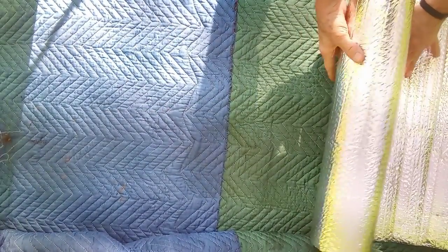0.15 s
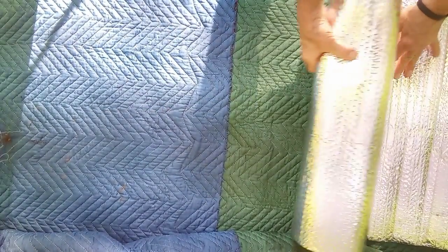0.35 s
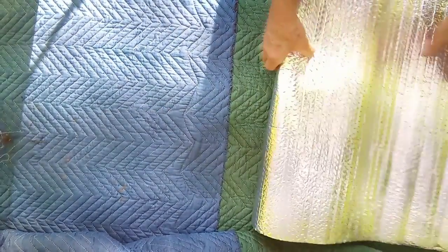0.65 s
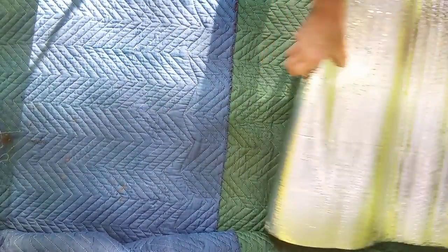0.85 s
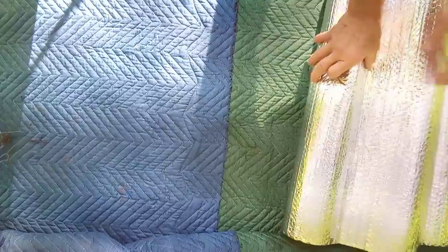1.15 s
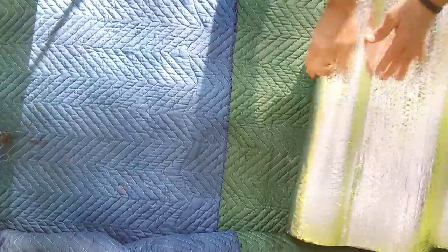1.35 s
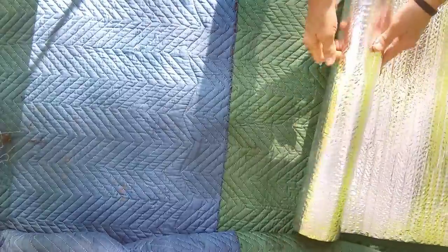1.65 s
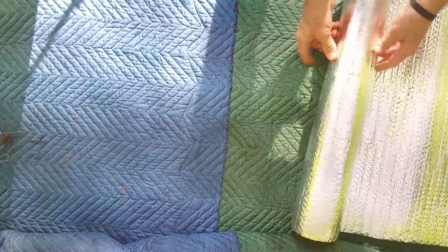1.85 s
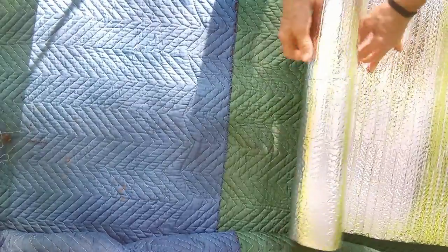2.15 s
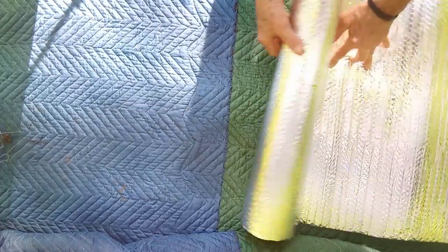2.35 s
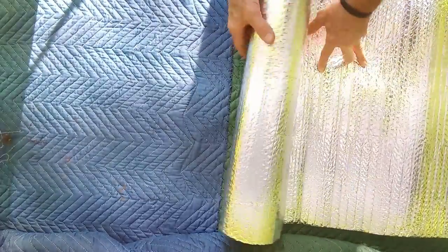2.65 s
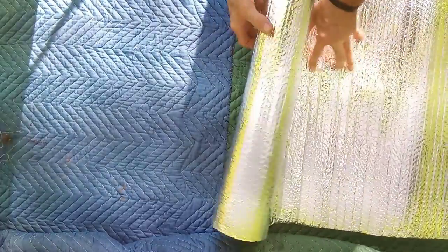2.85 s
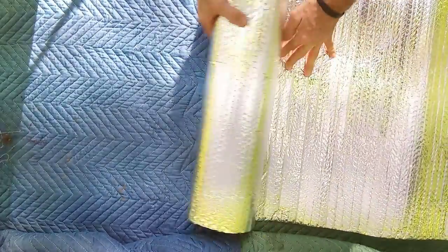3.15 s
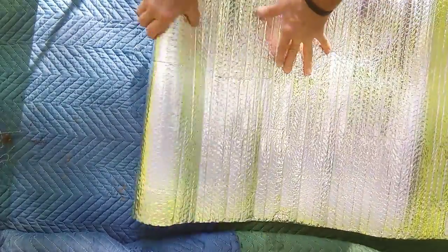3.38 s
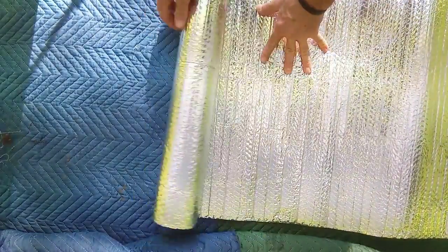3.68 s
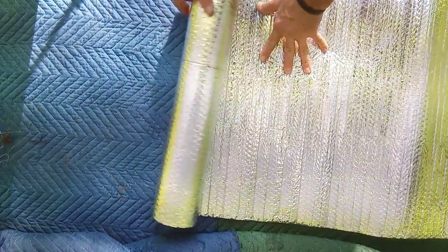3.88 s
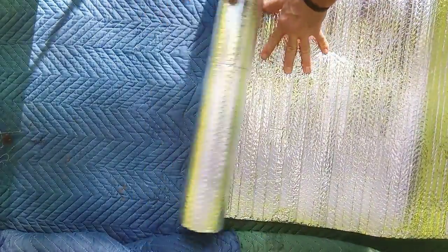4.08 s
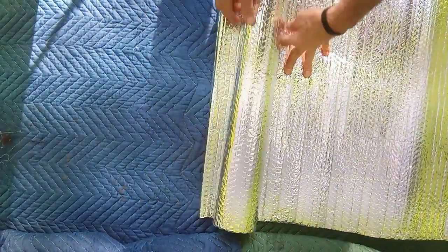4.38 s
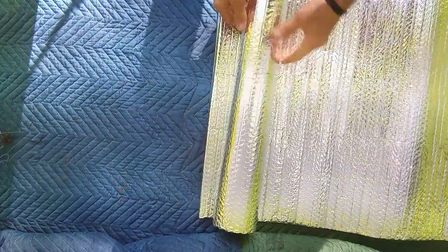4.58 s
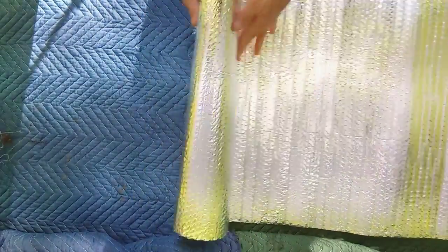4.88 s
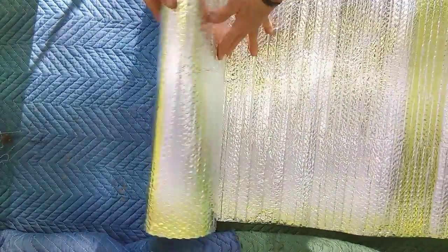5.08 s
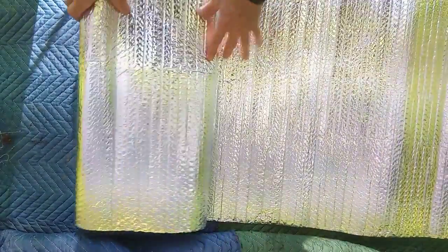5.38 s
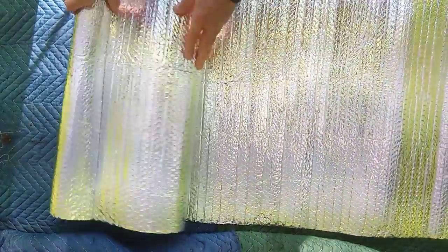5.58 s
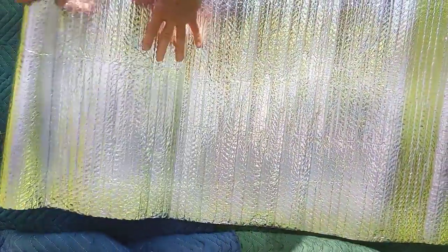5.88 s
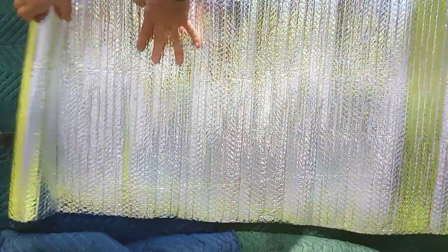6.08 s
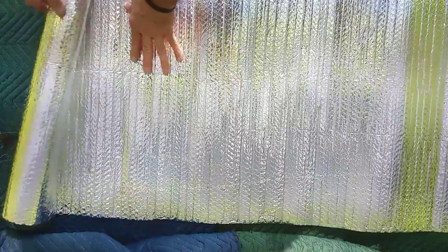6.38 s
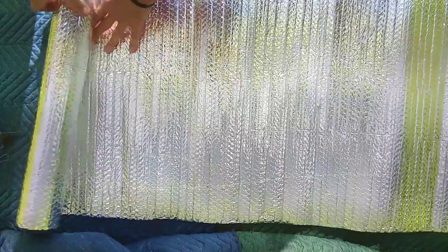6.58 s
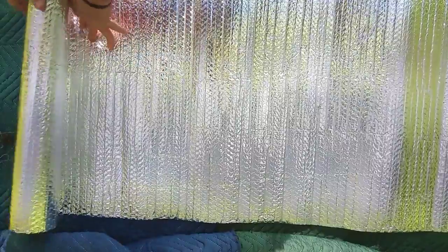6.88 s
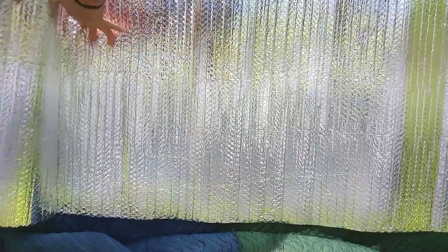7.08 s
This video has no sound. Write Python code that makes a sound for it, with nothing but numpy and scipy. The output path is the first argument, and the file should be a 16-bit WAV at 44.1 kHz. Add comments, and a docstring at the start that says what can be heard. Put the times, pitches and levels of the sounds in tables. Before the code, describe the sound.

Close, dry stereo outdoors with barely audible open air. From 0 s a foil-faced foam mat crackles brightly, countless tiny buckles over a papery rustle, mostly right of centre. Pulls surge at 0.2-1.1 s with sharp crease snaps near 0.4, 0.5 and 0.9, taut foil faintly singing, and hollow sliding on cloth. A crisp flare at 1.45 leads to uneven rustles, palm rubs and soft tube rumbles until 2.3. The strongest dull thump lands at 2.4-2.5, another near 3.0 and 3.3, amid continued crinkling to 3.7. From 3.8 to 4.8 it is sparser, stop-and-go, with clicks; at 4.37-4.5 fingers rasp and ribs pop in a rapid hollow rattle. Fuller crackle resumes at 4.85-5.85, with a double thud near 5.17. Shorter crinkly strokes, small snaps, light pats and a soft low air puff near 6.6 continue to a last flare at 7.2 s.

```python
"""A foil-faced foam mat is unrolled by hand over a quilted blanket, outdoors and heard from close by.
From the start, pulls and bends make the foil buckle in random avalanches of bright crackle, while
resonant noise slides with the foam on the cloth, the palm rubs and the turning tube rumbles.
Creases snap, fingers stick and slip, blows thud as dispersed pulses and taut foil sings in a narrow band.
Puffs of air follow, and midway ribs of the roll pop through in a quick run of decaying modes."""
import sys
import numpy as np
from scipy import signal
from scipy.fft import rfft, irfft, next_fast_len
from scipy.io import wavfile
from scipy.ndimage import uniform_filter1d, map_coordinates

SR = 44100
rng = np.random.default_rng(int(sys.argv[2]) if len(sys.argv) > 2 else 0)


def materialize(psi):
    """Save the field psi as 16-bit PCM at rate SR to the path in sys.argv[1].

    A 1-D psi becomes a single channel; in a 2-D psi each row is a channel.
    """
    bounded = np.clip(np.atleast_2d(psi).T, -1, 1)
    quanta = np.round(bounded * 32767).astype(np.int16)
    wavfile.write(sys.argv[1], SR, quanta)


N = 319276
TIME = np.arange(N) / SR
TOP_HZ = 15500  # upper limit of the sound

# Where the foil is worked. Each row: time in seconds, left minus right of the crinkle in dB,
# left minus right of the finest crackle in dB.
FOIL_PLACE = [(0.0, -8, -14), (0.9, -8, -10), (2.7, -8, -9), (3.2, -7, -9), (3.4, -6.5, -3),
              (4.45, -6, -3.5), (5.05, -7, -8), (5.26, -5, -1), (6.1, -7, 1), (6.6, -7, -2),
              (7.24, -4.5, 2.5)]
# The roll is patted or flops down. Each row: start in seconds, relative level in dB, pitch in Hz,
# ring time (60 dB decay) in seconds.
BLOWS = [(0.175, -34.5, 167, 0.3), (0.617, -34, 420, 0.12), (0.725, -37.5, 136, 0.036),
         (1.22, -41.5, 497, 0.17), (1.349, -32.5, 316, 0.02), (1.377, -30, 291, 0.013),
         (1.491, -35, 418, 0.2), (1.598, -33, 308.2, 0.023), (1.767, -37.5, 175, 0.095),
         (1.837, -31.5, 580, 0.024), (1.955, -35.5, 336, 0.038), (1.963, -38, 200.7, 0.12),
         (2.266, -35, 380, 0.053), (2.414, -21.5, 487, 0.038), (2.495, -25, 372, 0.045),
         (2.046, -43, 328, .04), (2.412, -41, 159, 0.055), (2.979, -40, 401, 0.021),
         (2.988, -29.5, 183, 0.084), (3.286, -37, 479.7, 0.027), (3.305, -36.5, 460, 0.027),
         (3.34, -26, 498, 0.016), (4.385, -37, 329, 0.023), (4.391, -50, 75, 0.078),
         (4.775, -38, 220.8, 0.25), (5.158, -31, 239.7, 0.024), (5.18, -25.5, 217, 0.1),
         (6.236, -37.5, 229, 0.051), (6.601, -45, 161.3, .05), (6.629, -42, 228, .08),
         (6.866, -34.5, 215.7, 0.079), (7.184, -35, 298.6, 0.011), (7.22, -42, 169.3, 0.039)]
# Colour of soft skin contact. Each row: frequency in Hz, relative level in dB.
TOUCH_COLOUR = [(200, -16), (700, -17), (1000, 3.5), (1250, 6.5), (1550, -9), (2200, 0), (5000, -51)]
# Colour of a snapping or clicking crease. Each row: frequency in Hz, relative level in dB.
TICK_COLOUR = [(1000, -29), (3000, -21), (6000, -1), (9000, 1), (12000, -5), (13800, -14), (15200, 3.5)]


def amp(db):
    """Decibels to gain."""
    return 10 ** (np.asarray(db) / 20)


def unit(x):
    """Scale to rms 1."""
    return x / np.sqrt(np.mean(x ** 2) + 1e-20)


def along(points, hz):
    """(Hz, value) points read on a log frequency axis."""
    f, v = np.transpose(points)
    return np.interp(np.log(hz + 1), np.log(f), v)


def curves(rows):
    """One value per sample for each column after the time."""
    s, *cols = np.transpose(rows)
    return [np.interp(TIME, s, c) for c in cols]


def wobble(rate):
    """A smooth random curve with rate knots a second."""
    knots = rng.standard_normal(8192)
    return map_coordinates(knots, [TIME * rate], mode="wrap")


def gesture(start, end, attack, release):
    """Gain that swells up to start, holds until end and dies away; attack and release are time constants."""
    rising = (start - TIME) / attack
    falling = (TIME - end) / release
    return np.exp(-np.clip(np.maximum(rising, falling), 0, 20))


def filtered(x, response):
    """x times a response of frequency."""
    m = next_fast_len(N + SR // 2)
    return irfft(rfft(x, m) * response(np.fft.rfftfreq(m, 1 / SR)), m)[..., :N]


def ring(x, spectrum, size=2048):
    """Causal (minimum-phase) colour: each click rings after it starts, never before."""
    cep = irfft(np.log(amp(along(spectrum, np.fft.rfftfreq(size, 1 / SR)))))
    cep[1:size // 2] *= 2
    cep[size // 2 + 1:] = 0
    answer = irfft(np.exp(rfft(cep)))
    return signal.fftconvolve(x, answer[None] / np.linalg.norm(answer), axes=1)[:, :N]


def pair(side_db):
    """Stereo white noise with a given share of difference between the ears."""
    mid, side = rng.standard_normal((2, N))
    return unit(np.array([mid + amp(side_db) * side, mid - amp(side_db) * side]))


def panned(db):
    """Left and right gains of constant power for a left minus right level in dB."""
    g = np.array([amp(db / 2), amp(-db / 2)])
    return g / np.sqrt(np.mean(g ** 2, axis=0))


def add(track, s, sound):
    """Lay a sound into a track at s seconds."""
    start = max(round(s * SR), 0)
    track[:, start:start + sound.shape[-1]] += sound[..., :N - start]


def bursts(rate, spread_db, life):
    """Power of random bursts of uneven size that start at once and die away; mean 1."""
    size = amp(spread_db * np.minimum(rng.standard_normal(N), 2))
    starts = rng.random(N) < rate / SR
    power = signal.lfilter([1], [1, -np.exp(-1 / (life * SR))], starts * size ** 2)
    return power / power.mean()


def patchy(x, depth_db, size=1024):
    """Every spot of the sheet has its own colour, so the colour shifts as the contact moves."""
    z = signal.stft(x, nperseg=size, noverlap=size * 3 // 4)[2]
    field = uniform_filter1d(rng.standard_normal(z.shape[1:]), size=5, axis=0)
    field = uniform_filter1d(field, size=7, axis=1)
    coloured = z * amp(depth_db * unit(field))
    return unit(signal.istft(coloured, nperseg=size, noverlap=size * 3 // 4)[1][:, :N])


def singing(centre_hz, width_hz, side_db):
    """A narrow band of noise that follows a moving pitch: slow noise shifted up in frequency."""
    slow = filtered(pair(side_db), lambda hz: 1 / (1 + (hz / width_hz) ** 2))
    analytic = signal.hilbert(slow, next_fast_len(N))[:, :N]
    carrier = np.exp(2j * np.pi * np.cumsum(centre_hz - width_hz / 2) / SR)
    return unit(np.real(analytic * carrier))


def hollow(x):
    """The air inside the roll rings along with the direct sound."""
    # Resonances of the rolled tube. Each row: frequency in Hz, width in Hz, relative level in dB.
    tube_modes = [(153, 33, -2), (212, 32, -4), (590, 65, -2.5), (1290, 97, -18), (1650, 63, -1.5)]

    def modes(f):
        return sum(amp(db) * 1j * f * width / (hz * hz - f * f + 1j * f * width)
                   for hz, width, db in tube_modes)

    return filtered(x, lambda f: 0.62 + 0.51 * modes(f))


def travelling(x):
    """The nearer microphone hears the roll first."""
    # The roll's path past the microphones. Each row: time in seconds, lead of the left ear in ms.
    lead_rows = [(0, 0.2), (.9, 0.27), (1.7, 0.28), (3.2, -0.0095), (4.7, -0.25), (5.4, -0.26),
                 (7.2, -0.28)]
    lead_ms, = curves(lead_rows)
    shift = lead_ms / 1000 / 2  # seconds, half to each ear
    return np.array([np.interp(TIME + shift, TIME, x[0]), np.interp(TIME - shift, TIME, x[1])])


def open_air():
    """Faint open air: steady coloured noise."""
    # Each row: frequency in Hz, relative level in dB.
    air_colour = [(20, -40), (80, -15), (200, -1.5), (700, -11.5), (1300, -7.5), (4000, -5.5), (15000, -15)]
    return amp(-65.0) * unit(ring(pair(-11.0), air_colour))


def snagging():
    """Drop in dB while the sheet is caught and stops bending."""
    # The crackle stalls. Each row: time it comes free in seconds, length in seconds, level change in dB.
    snag_rows = [(.396, .012, -5), (.471, .012, -6), (1.392, .02, -5), (1.64, .02, -3), (2.674, .015, -3),
                 (3.125, .02, -4), (3.77, .018, -4), (4.113, .02, -4), (4.36, .015, -3), (4.439, .016, -6),
                 (4.629, .01, -4), (4.722, .02, -7), (5.005, .025, -5), (5.563, .005, -2),
                 (6.52, .02, -1.5), (6.719, .012, -2)]
    return sum(db * gesture(s - length, s, attack=.008, release=.002) for s, length, db in snag_rows)


def flexing():
    """Pulls and bends add their power: relative dB of the crinkle, the rustle and the finest crackle."""
    # The hand pulls a length off the roll. Each row: start and end in seconds, then relative levels
    # in dB of the crinkle, the papery rustle and the finest crackle.
    pull_rows = [(0.0, 0.142, -49.5, -58.5, -56.5), (0.21, 0.272, -46, -53.5, -59),
                 (0.376, 0.473, -48.5, -53.5, -59), (0.533, 0.6, -45, -55, -54),
                 (0.634, 1.037, -45.5, -53.5, -51), (1.007, 1.145, -47.5, -54.5, -68),
                 (1.404, 1.46, -40, -61, -52), (1.483, 1.566, -46.5, -53, -62),
                 (1.634, 1.883, -51, -51, -58), (1.953, 2.14, -49.5, -55.5, -58),
                 (2.151, 2.618, -47.5, -54.5, -52.5), (2.675, 2.828, -51.5, -57.5, -53.5),
                 (2.85, 2.897, -59, -63, -61.5), (2.934, 3.093, -48.5, -54, -50),
                 (3.149, 3.698, -50, -57, -53.5), (3.787, 3.838, -58, -59.5, -58.5),
                 (3.946, 4.036, -54.5, -61, -60), (4.122, 4.183, -60, -61, -59.5),
                 (4.242, 4.266, -52, -59, -57), (4.361, 4.414, -56, -52, -53),
                 (4.512, 4.613, -59.5, -57.5, -55.5), (4.806, 4.848, -52, -50, -56),
                 (4.885, 5.312, -47, -53.5, -56), (5.357, 5.849, -48, -58, -54.5),
                 (5.924, 6.08, -48, -62, -53.5), (6.16, 6.243, -48.5, -64, -53.5),
                 (6.34, 6.377, -48.5, -56, -53), (6.418, 6.496, -55.5, -73, -56.5),
                 (6.517, 6.62, -50.5, -69, -48.5), (6.651, 6.824, -52, -58, -52.5),
                 (6.947, 6.995, -50.5, -62, -53.5), (7.111, 7.235, -49, -58.5, -55.5)]
    # The sheet bends sharply and the crinkle flares. Each row: peak time in seconds, relative levels
    # in dB of the crinkle and the papery rustle.
    bend_rows = [(0.26, -41.5, -59), (0.701, -42.5, -45.5), (0.98, -43, -55), (1.46, -46, -45.5),
                 (1.765, -48, -46.5), (1.85, -64.5, -50), (2.18, -54, -51), (2.439, -43, -52.5),
                 (2.799, -49, -67), (3.068, -48.5, -50.5), (3.37, -44, -70), (3.469, -44.5, -64),
                 (3.67, -62, -53), (4.27, -64.5, -51), (4.899, -58, -58.5), (5.06, -45.5, -47.5),
                 (5.24, -45.5, -55.5), (5.41, -46.5, -62), (6.227, -48.5, -48.5), (6.98, -53.5, -50.5),
                 (7.23, -42.5, -54)]
    # The mat is only held: relative levels in dB of the crinkle, the rustle and the finest crackle.
    resting_db = [-58, -70, -63.5]
    bend_fine_db = -18  # finest crackle of a bend, relative to its crinkle
    power = amp(resting_db)[:, None] ** 2 * np.ones(N)
    for start, end, crinkle_db, rustle_db, fine_db in pull_rows:
        pull = gesture(start, end, attack=0.0288, release=0.0537)
        power += np.outer(amp([crinkle_db, rustle_db, fine_db]), pull) ** 2
    for s, crinkle_db, rustle_db in bend_rows:
        bend = gesture(s, s, attack=0.041, release=0.029)
        power += np.outer(amp([crinkle_db, rustle_db, crinkle_db + bend_fine_db]), bend) ** 2
    unevenness_db = 0.61 * wobble(45)  # no pull is quite steady
    return 10 * np.log10(power) + snagging() + unevenness_db


def buckles(pops, avalanches, bed, patchy_db):
    """Tiny buckles come thickly and in avalanches; each scatters through the sheet for an instant."""
    grains = (pops + abs(bed)) / (1 + abs(bed))
    envelope = np.sqrt(grains * (avalanches + 2))
    return unit(envelope * patchy(pair(0), patchy_db))


def dimples(count=2400):
    """Embossed dimples flip one by one, each a decaying sine with its own pitch and size."""
    centre_hz, pitch_spread = 4900, .27  # spread as a log ratio
    decay_cycles, size_spread_db = 3.5, 4.5
    track, t = np.zeros((2, N)), np.arange(SR // 80) / SR
    for s, (pitch, size, side) in zip(rng.random(count) * N / SR, rng.standard_normal((count, 3))):
        hz = min(centre_hz * np.exp(pitch_spread * pitch), TOP_HZ)
        phase = rng.uniform(0, 2 * np.pi, (2, 1))
        pop = np.sin(2 * np.pi * hz * t + phase) * np.exp(-t * hz / decay_cycles)
        add(track, s, amp(size_spread_db * min(size, 2)) * panned(2 * side)[:, None] * pop)
    return unit(track)


def ticks(crinkle_db):
    """Tiny creases click; their size hardly follows the effort, so they stand out when the mat slows."""
    clicks = np.sqrt(bursts(rate=45, spread_db=3, life=.0007)) * pair(0)
    return amp(.5 * crinkle_db - 37) * unit(ring(clicks, TICK_COLOUR))


def foil(crinkle_db, rustle_db, fine_db):
    """Bending makes the foil skin crinkle and the sheet beneath it rustle."""
    # Colours of the foil skin, the finest crackle and the sheet beneath.
    # Each row: frequency in Hz, relative level in dB.
    skin_colour, fine_colour, sheet_colour = [(1500, -40), (2800, -14), (3700, -9), (5100, -4), (5950, 1),
                                              (6500, -2.5), (7200, -3.5), (7900, -10.5), (10000, -12.5),
                                              (12000, -19), (14000, -29), (16000, -34)], [(6500, -32), (9000, -14), (11000, -11),
                                                            (12500, -11.5), (13900, -12), (14500, -3),
                                                            (15100, 2), (15500, 1.5), (16000, -12)], [(400, -32.5), (800, -22),
                                                                             (1050, -12), (1270, -18),
                                                                             (1550, -10.5), (1850, -8),
                                                                             (2200, -1.5), (2700, -1.5),
                                                                             (3200, 2), (3900, -9.5),
                                                                             (5500, -14.5)]
    # The treble reaches the two microphones differently. Each row: frequency in Hz, left minus right in dB.
    ear_shade = [(1000, 5), (1280, 5), (1600, 14), (2200, 5.5), (2700, 9), (4000, 3), (5500, 3),
                 (7000, -3.5), (8800, -8.5), (11000, -3), (13500, 1), (15300, 3)]
    crowd_db = -50  # crinkle level at which the buckles merge into hiss
    dimple_db = -9  # relative to the foil skin
    place_db, fine_place_db = curves(FOIL_PLACE)
    pops = bursts(rate=1200, spread_db=4.5, life=.0003)
    avalanches = bursts(rate=240, spread_db=3.5, life=.005)
    creases = bursts(rate=750, spread_db=4, life=.0009)
    pinpricks = bursts(rate=1200, spread_db=4, life=.0006)
    crowd = amp(crinkle_db - crowd_db)  # slow bending leaves gaps between the buckles
    skin = unit(ring(buckles(pops, avalanches, bed=crowd, patchy_db=2.2), skin_colour))
    fine = unit(ring(buckles(pinpricks, avalanches, bed=0.46 * crowd, patchy_db=2.0), fine_colour))
    folds = buckles(creases, avalanches, bed=.7, patchy_db=2.4)
    folds = folds + 0.055 * folds[::-1]  # a little of each ear reaches the other
    rustle = amp(rustle_db + 3.5) * unit(hollow(ring(folds, sheet_colour)))
    crinkle = amp(crinkle_db + 1.5) * (skin + amp(dimple_db) * dimples()) + ticks(crinkle_db)
    placed = (crinkle + rustle) * panned(place_db)
    shaded = filtered(placed, lambda hz: panned(along(ear_shade, hz)))
    return shaded + amp(fine_db + 3.5) * fine * panned(fine_place_db)


def dragging(crinkle_db):
    """Relative dB and pitch in Hz of the sliding; each drag glides from its first pitch to its last."""
    # The mat drags over the blanket. Each row: start and end in seconds, relative level in dB,
    # pitch at the start in Hz, pitch at the end in Hz.
    drag_rows = [(0.0, 0.042, -55, 674, 526), (0.176, 0.215, -47.5, 364.3, 398.4),
                 (0.288, 0.562, -61, 416.3, 480), (0.598, 0.831, -49, 438, 582),
                 (0.912, 0.945, -47.5, 738, 725), (0.954, 1.04, -49, 623, 667.4),
                 (1.391, 1.51, -48, 381.3, 494), (1.563, 1.679, -54.5, 461, 509),
                 (1.738, 1.863, -52.5, 418.7, 627), (1.962, 2.047, -63.5, 334, 393),
                 (2.196, 2.331, -65.5, 428, 360), (2.395, 2.505, -55.5, 527, 340),
                 (2.595, 2.705, -57, 340.3, 342), (2.99, 3.003, -48.5, 478, 453),
                 (3.258, 3.348, -51.5, 437, 513), (3.574, 3.686, -64.5, 446, 433),
                 (4.08, 4.163, -57.5, 369.6, 397.6), (4.175, 4.201, -52.5, 553, 571),
                 (4.24, 4.278, -48.5, 640, 648), (4.38, 4.404, -45.5, 659, 648),
                 (4.435, 4.468, -54.5, 782, 780), (4.5, 4.678, -68, 647, 580),
                 (4.986, 5.056, -60, 610, 544), (5.185, 5.568, -64.5, 324, 392.5),
                 (5.794, 5.855, -62, 410.7, 432), (6.173, 6.252, -58.5, 500, 500),
                 (6.365, 6.388, -61.5, 541, 520), (6.885, 7.0, -63, 310, 277.6),
                 (7.182, 7.244, -56.5, 512, 487)]
    creep_db, creep_hz = -21.5, 486  # between drags the foam creeps: relative to the crinkle, pitch
    power = amp(crinkle_db + creep_db) ** 2
    pitch = power * creep_hz
    for start, end, db, from_hz, to_hz in drag_rows:
        drag = (amp(db) * gesture(start, end, attack=0.016, release=0.022)) ** 2
        power = power + drag
        pitch = pitch + drag * np.interp(TIME, [start, end], [from_hz, to_hz])
    return 10 * np.log10(power), pitch / power


def sliding(crinkle_db):
    """Foam drags over quilting in uneven catches: a hollow hush with a faint note gliding with the stroke."""
    sharpness, spread = 1.81, 0.32  # of each resonance; log ratio around the pitch
    slide_db, centre_hz = dragging(crinkle_db)
    sound, weights = np.zeros((2, N)), np.zeros(N)
    for band_hz in np.geomspace(280, 900, num=8):
        def resonance(hz):
            return 1 / (1 + (sharpness * (hz / band_hz - band_hz / (hz + 1))) ** 2)

        band = unit(filtered(pair(-14), resonance))
        weight = np.exp(-(np.log(centre_hz / band_hz) / spread) ** 2)
        sound += weight * band
        weights += weight ** 2
    note = singing(centre_hz, width_hz=70, side_db=-14)
    hush = patchy(sound / np.sqrt(weights + 1e-9), depth_db=3.0)
    mix = unit(hush + .55 * note)
    catches = unit(np.sqrt(bursts(rate=190, spread_db=3, life=.004) + 1.6))
    return amp(slide_db - 0.7) * catches * mix


def rolling(crinkle_db):
    """The soft tube rumbles as it turns over, after each bump, and faintly whenever the mat is worked."""
    # The tube turns over on the blanket. Each row: peak time in seconds, relative rumble level in dB,
    # time constant of the swell and fade in seconds.
    turn_rows = [(0.045, -49, 0.017), (0.21, -51, 0.045), (0.74, -55.5, 0.051), (1.43, -71, 0.037),
                 (1.6, -52, 0.02), (1.79, -46.5, 0.047), (1.985, -64, 0.028), (2.04, -51, 0.017),
                 (2.299, -54, 0.092), (2.509, -40, 0.012), (2.65, -59, 0.034), (3.31, -57, 0.03),
                 (3.61, -59, 0.029), (3.71, -58, 0.02), (3.95, -64, 0.029), (4.14, -70, .05),
                 (4.269, -52.5, 0.022), (4.39, -54, 0.018), (4.52, -61, 0.029), (5.003, -57, 0.011),
                 (5.06, -58, 0.024), (5.23, -52.5, 0.043), (5.82, -65.5, 0.015), (6.26, -51.5, 0.018),
                 (6.39, -52, 0.027), (6.65, -62.5, 0.015), (6.94, -65, 0.05), (6.999, -51, 0.013),
                 (7.24, -59, 0.014)]
    # Each row: frequency in Hz, relative level in dB.
    tube_colour = [(30, -27), (80, -13), (120, -4), (160, 2.5), (225, 2), (290, 0), (380, -4), (500, -42),
                   (1000, -35)]
    shake_db = -22.5  # rumble after a bump, relative to the bump's level in the table
    turns = sum((amp(db) * gesture(s, s, swell, swell)) ** 2 for s, db, swell in turn_rows)
    shakes = sum((amp(db + shake_db) * gesture(s, s, attack=0.013, release=0.011)) ** 2
                 for s, db, _, _ in BLOWS)
    level = np.sqrt(turns + shakes + amp(crinkle_db - 45.0) ** 2)
    unevenness = amp(-1.5 + 5.8 * wobble(37))
    return level * unevenness * unit(ring(pair(-15.5), tube_colour))


def palm(rustle_db):
    """The hand rubs on the roll as it works the sheet: a soft, narrow resonance that drifts with the grip."""
    # The palm rubs along the roll. Each row: start in seconds, end in seconds, relative level in dB.
    rub_rows = [(0.01, 0.065, -54), (0.645, 0.79, -56), (0.951, 1.034, -53), (1.686, 1.734, -57.5),
                (1.957, 2.071, -53), (2.129, 2.336, -57), (2.376, 2.429, -53), (2.69, 2.721, -54),
                (2.985, 3.009, -49.5), (3.584, 3.68, -60.5), (3.916, 3.985, -63), (4.08, 4.198, -63),
                (4.805, 5.082, -58.5), (5.13, 5.273, -53), (5.787, 5.923, -60.5), (6.337, 6.466, -61),
                (6.529, 6.665, -58), (6.767, 6.913, -61), (6.973, 6.986, -55), (7.12, 7.24, -81)]
    palm_db = -8  # steady share of the rub, relative to the rustle
    grip_hz, grip_drift_db = 1259, 1.13  # resonance under the hand; drift of its pitch as 20 log10 of the ratio
    grip_db = 3  # resonance over the broad rub
    rubs = sum((amp(db) * gesture(start, end, attack=0.012, release=0.0062)) ** 2
               for start, end, db in rub_rows)
    catches = np.sqrt(bursts(rate=180, spread_db=2.5, life=0.017) + 0.1)
    breadth = unit(ring(pair(-2.3), TOUCH_COLOUR))
    resonance = singing(grip_hz * amp(grip_drift_db * wobble(7)), width_hz=130, side_db=0.5)
    level = np.sqrt(rubs + amp(rustle_db + palm_db) ** 2)
    return level * unit(catches * (breadth + amp(grip_db) * resonance))


def snaps():
    """A larger crease pops through with a bright tick of fast-dying noise."""
    # Single creases snap. Each row: start in seconds, relative level in dB, left minus right in dB.
    snap_rows = [(0.0615, -34, -9), (0.0977, -32, -14), (0.176, -33, -13), (0.3245, -36, -10),
                 (0.377, -33, -11), (0.398, -23.5, -12), (0.4155, -30, -11), (0.4727, -22.5, -7),
                 (0.5038, -32, -11), (0.5926, -30, -10), (0.7805, -29, -14), (0.9212, -24, -7),
                 (1.1225, -32, -9), (1.166, -34, -9), (1.229, -39, -9), (1.273, -38, -9), (1.299, -41, -9),
                 (1.3843, -33, -11), (1.3978, -29, -11), (1.7594, -27, -7), (2.387, -31, -11),
                 (2.6779, -28, -11), (2.729, -31, -8), (2.7939, -31, -5), (2.9275, -31, -8),
                 (3.0185, -31, -7), (3.531, -31, -5), (3.746, -29, -4), (3.946, -37, -2), (4.0153, -34, -6),
                 (4.022, -33, -3), (4.117, -33, -5), (4.2028, -37, -6), (4.3665, -34, -2), (4.443, -32, -8),
                 (4.587, -35, -7), (4.596, -37, -7), (4.633, -30, -9), (4.7263, -35, -9), (5.1587, -29, -5),
                 (5.2036, -31, -8), (5.225, -31, -7), (5.5663, -29, -3), (5.6057, -30, -4),
                 (5.6925, -33, -3.5), (6.0806, -28, -2), (6.106, -32, -6), (6.5241, -32, -6),
                 (6.7231, -35, -3.5)]
    track, t = np.zeros((2, N)), np.arange(SR // 40) / SR
    decay = np.exp(-t / .0013) + .08 * np.exp(-t / .005)
    for s, db, pan_db in snap_rows:
        tick = np.tanh(rng.standard_normal((2, len(t)))) * decay
        tick = ring(tick, TICK_COLOUR)
        tick = tick / np.abs(tick).max(axis=1, keepdims=True)
        add(track, s, amp(db) * panned(pan_db)[:, None] * tick)
    return track


def scrubs():
    """Skin catches and slips in a quick uneven train; a light push sounds softly, a hard one rasps."""
    # Fingers stick and slip on the foil. Each row: time of the strongest slip in seconds,
    # relative level in dB, time constants of the build-up and the fade in seconds.
    scrub_rows = [(0.173, -47.5, 0.0077, 0.007), (.22, -46.5, 0.021, 0.019), (1.759, -42, 0.0088, 0.024),
                  (1.845, -53, 0.0064, 0.016), (2.259, -42, 0.0039, 0.022), (2.377, -44.5, 0.0032, 0.021),
                  (2.49, -44.5, 0.0056, 0.0096), (3.531, -44, 0.0008, 0.0053), (4.255, -43, 0.022, 0.025),
                  (4.386, -38.5, 0.009, 0.013), (4.402, -28.5, 0.0073, 0.007), (4.437, -47, 0.0097, 0.0037),
                  (4.454, -42, 0.0056, 0.013), (4.5, -52.5, 0.012, 0.04), (4.693, -51, 0.0028, 0.0038),
                  (4.77, -43, 0.0038, 0.0038), (6.179, -48, 0.0023, .005), (6.227, -48, 0.0067, 0.0082),
                  (6.575, -55, .02, .02)]
    # Rasp of a hard push. Each row: frequency in Hz, relative level in dB.
    finger_colour = [(100, -20), (300, 0), (650, -14), (900, -1), (1100, -1), (1300, 9), (1700, -13),
                     (2200, -8), (3200, -6), (4200, -23), (6000, -20), (12000, -48)]
    hard_push_db = -37  # push at which soft touch and rasp get equal weight
    push = np.zeros(N)
    for s, db, rise, fade in scrub_rows:
        push += amp(db) * np.exp(-np.maximum((s - TIME) / rise, (TIME - s) / fade))
    slip_hz = 420 * amp(3 * wobble(300))
    slips = np.diff(np.floor(np.cumsum(slip_hz) / SR), prepend=0)  # a click at each whole cycle
    scatter = signal.lfilter([1], [1, -np.exp(-1 / (0.00042 * SR))], slips) * pair(-3.5)
    judder = .5 * unit(slips) + unit(scatter)
    hard = push / (push + amp(hard_push_db))
    rasp = hard * unit(ring(judder, finger_colour))
    soft = (1 - hard) * unit(ring(judder, TOUCH_COLOUR))
    return push * (rasp + soft)


def bumps():
    """A blow travels as a bending wave, so the highs arrive first; then the tube rings briefly."""
    ring_db = -12  # the tube's own note, relative to the thud
    track, t = np.zeros((2, N)), np.arange(SR // 4) / SR
    hz = np.fft.rfftfreq(len(t), 1 / SR) + 1
    bending = np.exp(-1j * 1.024 * np.sqrt(hz))  # delay falls with frequency
    for s, db, pitch_hz, t60 in BLOWS:
        shape = np.exp(-(np.log(hz / pitch_hz) / 0.53) ** 2) / (1 + (hz / 670) ** 10)
        decay = amp(-60 * t / t60)
        flutter = 0.062 * rng.standard_normal(len(t)) * decay
        thud = irfft((1 + rfft(flutter)) * shape * bending, len(t))
        thud = thud / np.abs(thud).max()
        note = np.sin(2 * np.pi * pitch_hz * t) * decay * (1 - np.exp(-t * pitch_hz / 2))
        add(track, s, amp(db - 5.5) * (thud + amp(ring_db) * note) * (t < t[-1] / 2))
    return track


def sheen():
    """Where the sheet is pulled taut, its crackle gathers into a narrow, grainy band."""
    # A taut stretch sings at one resonance. Each row: start and end in seconds, relative level in dB,
    # pitch in Hz, width of each of two equal poles in Hz.
    sheen_rows = [(0.403, .58, -47.5, 5900, 200), (.66, 0.895, -47, 5850, 230),
                  (0.948, 1.15, -46, 6000, 260), (0.953, 1.053, -51.5, 1940, 260),
                  (1.765, 1.798, -53.5, 1790, 198), (2.93, 3.085, -52, 6020, 220),
                  (4.24, 4.305, -56, 3250, 150), (4.877, 4.97, -50, 6000, 350),
                  (5.04, 5.25, -53.5, 5950, 350), (6.16, 6.242, -58.5, 3250, 180.3)]
    place_db, _ = curves(FOIL_PLACE)
    track = np.zeros((2, N))
    grains = np.sqrt(bursts(rate=600, spread_db=3.5, life=.0008) + .2) * pair(0)
    for start, end, db, pitch_hz, width_hz in sheen_rows:
        pole = np.exp((2j * np.pi * pitch_hz - 2 * np.pi * width_hz) / SR)
        band = signal.lfilter([1], np.poly([pole, pole]), grains).real
        track += amp(db) * gesture(start, end, attack=0.011, release=0.019) * unit(band)
    return track * panned(place_db)


def draught():
    """Soft puffs of air, fanned by the sheet, press on the microphone ports."""
    # Each row: peak time in seconds, relative level in dB.
    puff_rows = [(0.76, -52.5), (1.39, -60.5), (1.55, -66), (2.41, -62), (4.28, -62), (4.39, -60.5),
                 (6.23, -73), (6.61, -56), (7.06, -63), (7.23, -60)]
    # Each row: frequency in Hz, relative level in dB.
    puff_colour = [(15, -48), (35, -40), (60, -13.5), (85, -4.5), (120, -13), (250, -32), (800, -83)]
    level = amp(-81.5) + sum(amp(db) * gesture(s, s, attack=0.018, release=0.033) for s, db in puff_rows)
    return level * unit(ring(pair(-9.0), puff_colour, size=8192))


def cracks():
    """Stiff ribs of the roll give way one after another, each with a short hollow pop."""
    # Ribs of the squeezed roll pop through. Each row: start in seconds, peak level in dB, pitch in Hz.
    crack_rows = [(3.5305, -39, 1900), (4.3725, -39, 950), (4.378, -30, 1250), (4.3825, -33, 850),
                  (4.3872, -29, 1400), (4.3915, -33, 900), (4.3965, -26, 1550), (4.4002, -23.5, 1800),
                  (4.4045, -27, 1100), (4.415, -36, 1550), (4.431, -41, 1350), (4.4385, -35, 1050),
                  (4.4505, -36, 1500), (4.4555, -30, 1450), (4.4645, -36, 1400), (4.477, -43, 1100),
                  (4.4995, -42, 1060), (4.524, -40, 1300)]
    # Modes of a rib. Each row: ratio to the pitch, relative level in dB.
    rib_modes = [(.58, -11), (1, 4.5), (1.3, -3.5)]
    t60, pitch_scatter = 0.015, 0.066  # ring time in seconds; relative spread of the pitch
    track, t = np.zeros((2, N)), np.arange(SR // 30) / SR
    for s, db, pitch_hz in crack_rows:
        spread = 1 + pitch_scatter * rng.standard_normal((2, 1))
        pop = sum(amp(level - 60 * t / t60) * np.sin(2 * np.pi * ratio * pitch_hz * spread * t)
                  for ratio, level in rib_modes)
        pop = pop * (1 - np.exp(-t / .0004))
        add(track, s, amp(db) * pop / np.abs(pop).max())
    return track


def scene():
    """The mat, over faint open air."""
    crinkle_db, rustle_db, fine_db = flexing()
    air = open_air()
    moving_roll = travelling(sliding(crinkle_db) + rolling(crinkle_db) + bumps())
    body = hollow(moving_roll + scrubs() + cracks() + palm(rustle_db))
    return foil(crinkle_db, rustle_db, fine_db) + sheen() + snaps() + body + draught() + air


def record(dry):
    """A very steep low-pass leaves next to nothing above the upper limit."""
    return filtered(dry, lambda hz: 1 / np.sqrt(1 + (hz / TOP_HZ) ** 900))


dry = scene()
out = record(dry)
materialize(out)
```